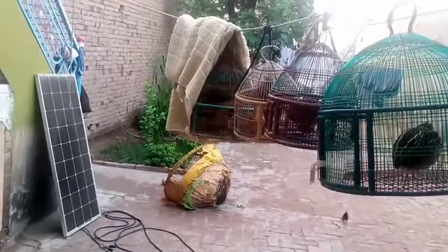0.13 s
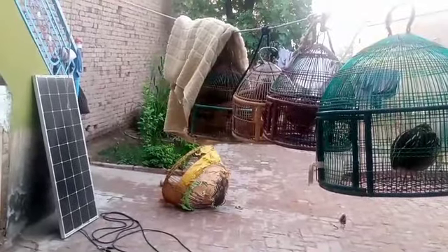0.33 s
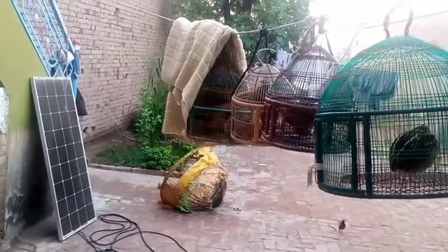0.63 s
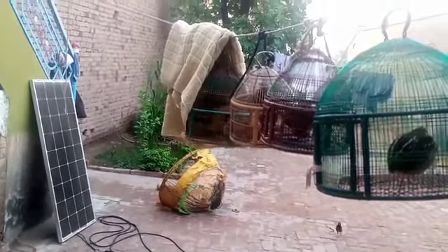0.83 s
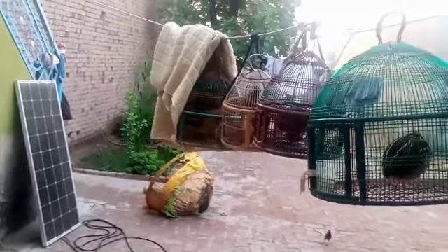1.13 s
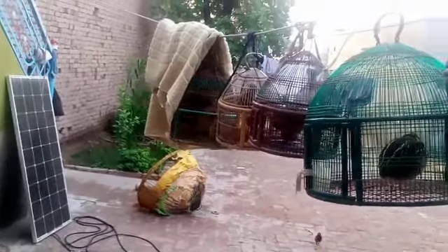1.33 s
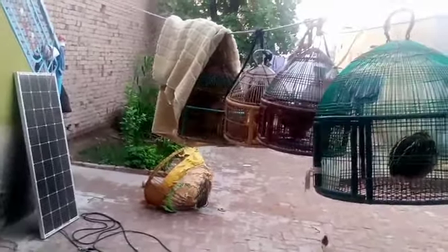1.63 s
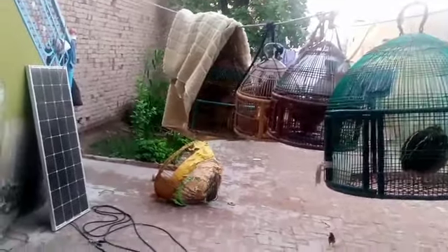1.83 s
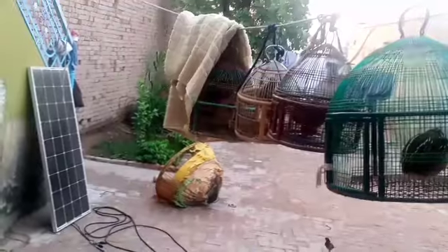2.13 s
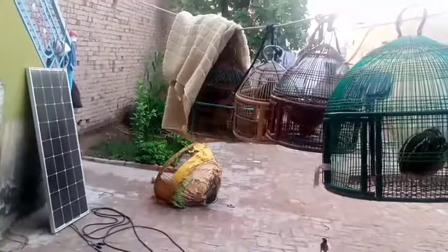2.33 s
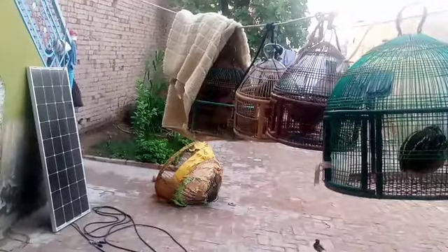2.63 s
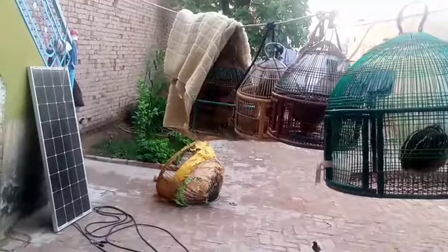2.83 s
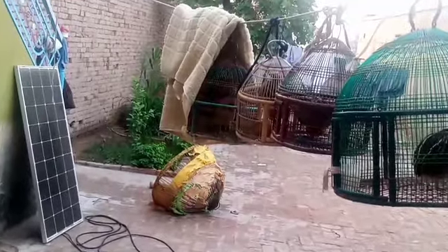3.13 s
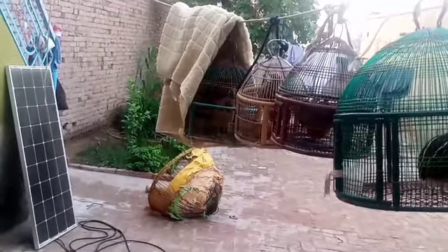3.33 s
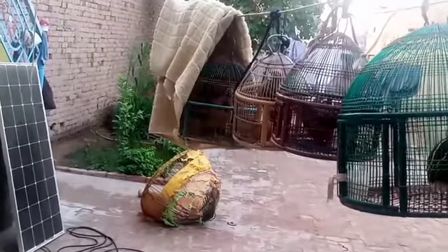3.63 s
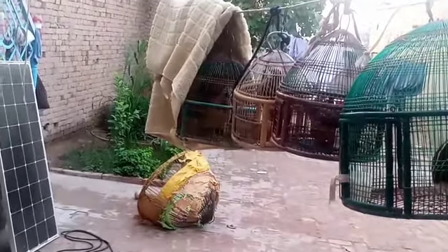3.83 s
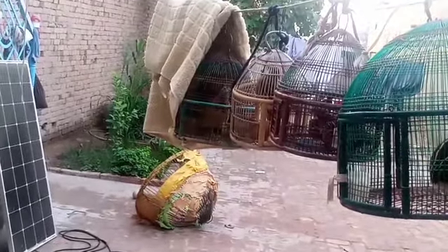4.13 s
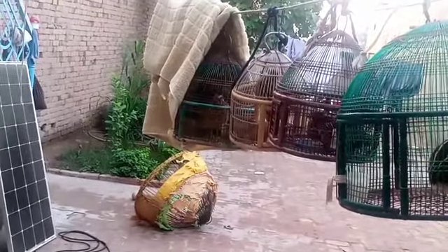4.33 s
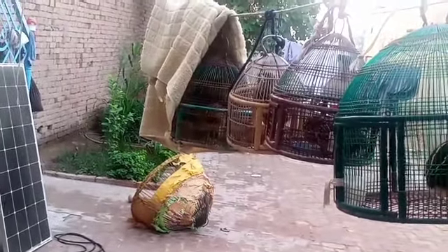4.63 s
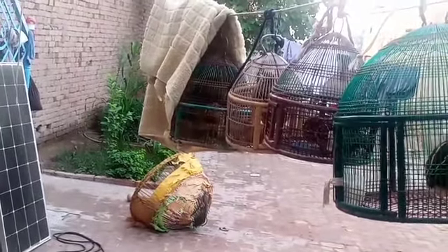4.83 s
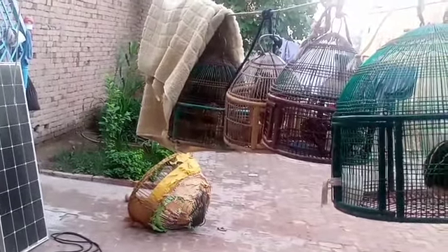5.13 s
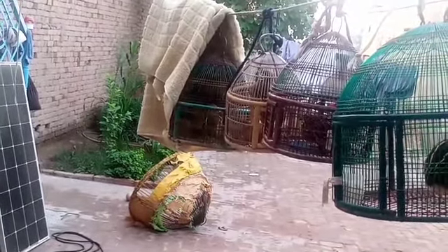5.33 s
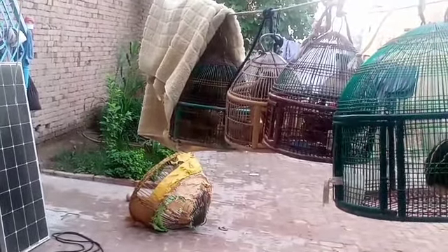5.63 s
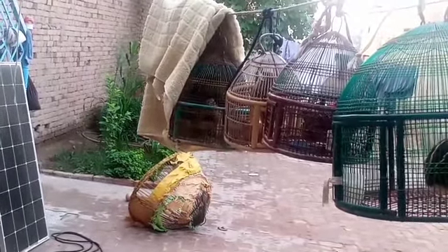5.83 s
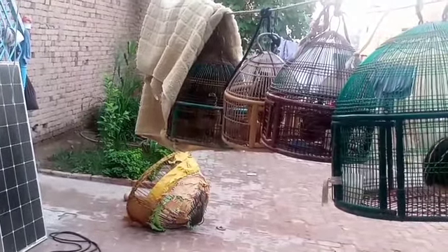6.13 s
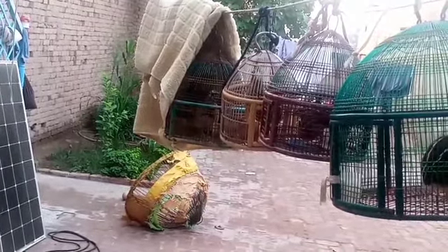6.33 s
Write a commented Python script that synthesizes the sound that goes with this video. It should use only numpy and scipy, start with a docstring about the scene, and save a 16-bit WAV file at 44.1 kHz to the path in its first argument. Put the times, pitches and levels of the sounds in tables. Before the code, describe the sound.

Piercing two-note quail calls flick steeply upward and ring off courtyard walls, over very quiet outdoor air, one dull knock and soft scuffing steps.

```python
"""A caged quail gives five sharp double calls in a brick courtyard: each note is a pure swept sine that sags,
creeps up, then flicks steeply upward. Near walls slap it back, a decaying noise tail makes the yard ring on,
and the loudest moments clip in the handheld phone. A bump on its case and taps on the cage bars ring damped
modes; shaped noise makes the scuffing shoes, footfalls, falling swishes and quiet outdoor murk, and
unsteady sines make two hums and the far-off birds."""
import sys
import numpy as np
from scipy import signal
from scipy.fft import rfft, irfft, next_fast_len
from scipy.io import wavfile
from scipy.ndimage import uniform_filter1d, map_coordinates

SR = 44100
rng = np.random.default_rng(int(sys.argv[2]) if len(sys.argv) > 2 else 0)


def unload_audio(sound):
    """Save the sound as a 16-bit wav file, at the path given as the first command line argument."""
    columns = np.transpose(np.atleast_2d(sound))
    # keep every value between -1 and 1, then stretch to whole-number steps
    steps = np.round(np.clip(columns, -1, 1) * 32767)
    wavfile.write(sys.argv[1], SR, steps.astype(np.int16))


N = 286429  # length in samples
LEAD_S = 0.01  # each note is rendered from this long before its start, to leave room for the swell


def amp(db):
    """Decibels to gain."""
    return 10 ** (np.asarray(db) / 20)


def unit(x):
    """Scale to rms 1."""
    return x / np.sqrt(np.mean(x ** 2) + 1e-20)


def along(points, hz):
    """Read a curve of (f/Hz, value) points on a log frequency axis."""
    f, v = np.transpose(points)
    return np.interp(np.log(hz + 1), np.log(f), v)


def clock():
    """The time of every sample, in seconds."""
    return np.arange(N) / SR


def wobble(rate):
    """A smooth random curve through `rate` random knots a second."""
    knots = rng.standard_normal(int(N * rate / SR) + 4)
    return map_coordinates(knots, [clock() * rate])


def filtered(x, response):
    """Shape the spectrum of x by a gain that is a function of frequency."""
    m = next_fast_len(N + SR // 2)
    gain = response(np.fft.rfftfreq(m, 1 / SR))
    return irfft(rfft(x, m) * gain, m)[:N]


def noise(spectrum, patchy_db):
    """Coloured noise of rms 1, with random gain patches smoothed over time and frequency."""
    z = signal.stft(rng.standard_normal(N), nperseg=1024)[2]
    field = uniform_filter1d(rng.standard_normal(z.shape), size=5, axis=0)
    field = uniform_filter1d(field, size=9, axis=1)
    patchy = signal.istft(z * amp(patchy_db * unit(field)), nperseg=1024)[1][:N]
    return unit(filtered(patchy, lambda hz: amp(along(spectrum, hz))))


def tone(hz, drift_hz):
    """A slightly unsteady sine of rms 1."""
    pitch = hz + drift_hz * wobble(15)
    return unit(np.sin(2 * np.pi * np.cumsum(pitch) / SR))


def add(track, s, sound):
    """Mix a sound into the track at time s."""
    start = max(round(s * SR), 0)
    track[start:start + len(sound)] += sound[:N - start]


def outdoors(air_db=8.6, swing=0.7, murmur_db=-5):
    """Faint far-off murk: broad noise of drifting level, patchier noise weighted low, two wavering hums."""
    # spectrum of the open air: f/Hz, relative level/dB per Hz
    air_spectrum = [(25, -23.5), (80, -7), (230, -10), (340, -6), (430, -10), (520, -8.5), (850, -15),
                    (1200, -16.5), (2250, -10.5), (3200, -16), (4600, -22), (6300, -20), (7400, -29.5),
                    (16000, -32)]
    # distant rumble of the town: f/Hz, relative level/dB per Hz
    town = [(40, -15), (90, 0), (200, -5), (350, 0), (600, -3), (1300, -14), (2500, -40)]
    # drift of the background, ahead of swing and air_db: t/s, level/dB
    air_drift = [(0.0, -73.5), (2.06, -71.5), (3.05, -76.5), (4.95, -73.5), (6.49, -76.5)]
    # faint hums: f/Hz, level/dB, waver/dB, drift/Hz
    hum_rows = [(338, -74.5, 8, 17), (999.1, -70.5, 3, 4)]
    times, drift_db = np.transpose(air_drift)
    level_db = np.interp(clock(), times, drift_db)
    mean_db = level_db.mean()
    level = amp(mean_db + swing * (level_db - mean_db) + air_db)
    murk = level * (noise(air_spectrum, patchy_db=3.0) + amp(murmur_db) * noise(town, patchy_db=5))
    hums = np.zeros(N)
    for hz, db, waver_db, drift_hz in hum_rows:
        hums += amp(db) * unit(amp(waver_db * wobble(13)) * tone(hz, drift_hz))
    return murk + hums


def yard_tail(build, clump_db=2):
    """Diffuse answer of the courtyard, energy 1: it builds up, comes in clumps, decays by frequency."""
    # ring time of the yard: f/Hz, t60/s
    ring_time = [(300, 0.25), (3300, 0.4968), (4200, 0.4847), (5000, 0.45), (6200, .44), (7100, 0.4217)]
    # strength of the yard's answer: f/Hz, level/dB
    colour = [(3350, -6), (3800, 2.93), (5000, -0.5)]
    hz, t, z = signal.stft(rng.standard_normal(SR), SR, nperseg=256)
    decay_db = -60 * t / along(ring_time, hz)[:, None]
    shaped = z * amp(along(colour, hz)[:, None] + decay_db)
    tail = signal.istft(shaped, SR, nperseg=256)[1][:SR]
    clumps = amp(clump_db * unit(uniform_filter1d(rng.standard_normal(SR), size=90)))
    onset = 1 - np.exp(-(np.arange(SR) / SR / build) ** 2)
    tail = tail * clumps * onset
    return tail / np.linalg.norm(tail)


def knee(x, width):
    """Zero below 0 and x above, with a rounded corner."""
    return width * np.logaddexp(0, x / width)


def whistle(length, low_hz, sag_hz, flick_db, creep_bend=0.0018, flick_bend=0.0023,
            top_bend_hz=150, flick_span_hz=700, octave_db=-45):
    """A near-pure tone settles, creeps, then flicks up and fades as it leaves the throat's resonance."""
    # the throat's loudness at each pitch: f/Hz, level/dB
    throat = [(3300, 0), (3550, -2), (4000, -6), (4800, -8.5), (5600, -8.5), (6400, -25.5), (7000, -24)]
    attack_s, swell_s, settle_s, release_s = 0.0058, 0.0027, 0.0074, 0.003
    creep_s, creep_hz_per_s = 0.027, 8030  # the creep leads the flick by creep_s
    flick_s, flick_hz_per_s, flick_top_hz = 0.01847, 251000, 7062.4

    t = np.arange(SR // 8) / SR - LEAD_S
    creep_hz = creep_hz_per_s * knee(t - length + creep_s, creep_bend)
    rise_hz = creep_hz + flick_hz_per_s * knee(t - length, flick_bend)
    pitch = low_hz + sag_hz * np.exp(-t / settle_s) + rise_hz
    pitch = flick_top_hz - knee(flick_top_hz - pitch, top_bend_hz)  # level off at the top
    phase = 2 * np.pi * np.cumsum(pitch) / SR
    swell = (1 + np.tanh((t - attack_s) / swell_s)) / 2
    release = np.clip((length + flick_s - t) / release_s, 0, 1)
    flick_share = np.clip(rise_hz / flick_span_hz, 0, 1)
    level = swell * release * amp(along(throat, pitch) + flick_db * flick_share)
    octave = level ** 2 * amp(octave_db) * np.sin(2 * phase)
    return level * np.sin(phase) + octave


def quail(tail_db=-6.5, build=0.017, lasting=0.33):
    """A long note, then a short one; each overlaps its own wall echoes, so it beats as the pitch climbs."""
    # echoes from walls and cages: delay/s, level/dB
    walls = [(.006951, -4.5), (.008834, -13), (.011006, -10), (.014671, -13), (.016645, -7.4),
             (.018001, -10.5), (.027055, -15), (0.0727, -22)]
    # double calls: start t/s, second note after/s, its time to the flick/s,
    # resting pitch of the long note f/Hz, level/dB, flick of the long note/dB
    calls = [(0.0228, 0.24, 0.04104, 3244, -2.5, -3), (1.3938, 0.23765, 0.04275, 3266, -4, -1),
             (2.7424, 0.23583, .0438, 3286, -2.5, 0.43), (4.0825, .2389, .0451, 3289, -2, -0.42),
             (5.3847, 0.24088, .046, 3278, -3.5, -0.19)]
    long_s, long_sag_hz = 0.0658, 343.5
    # the short note against the long one: its own sag, lower pitch, level and extra flick
    short_sag_hz, short_drop_hz, short_db, short_flick_db = 145.3, 25, -0.55, 1.503

    out, samples = np.zeros(N), np.arange(SR)
    # the direct sound, then each slap
    early = (samples == 0) + sum(amp(db) * np.sinc(samples - delay * SR) for delay, db in walls)
    fixed_tail, share = yard_tail(build), np.clip(lasting, 0, 1)
    for start, gap, short_s, low_hz, db, flick_db in calls:
        long_note = whistle(long_s, low_hz, long_sag_hz, flick_db)
        short_note = amp(short_db) * whistle(
            short_s, low_hz - short_drop_hz, short_sag_hz, flick_db + short_flick_db)
        for s, note in ((start, long_note), (start + gap, short_note)):
            # the phone moves a little between notes, so part of the yard's answer changes
            tail = np.sqrt(share) * fixed_tail + np.sqrt(1 - share) * yard_tail(build)
            heard = signal.fftconvolve(note, early + amp(tail_db) * tail)
            add(out, s - LEAD_S, amp(db) * heard)
    return out


def far_birds(note_width=0.055):
    """Short phrases of evenly spaced hoots or peeps, each an unsteady sine around one pitch."""
    # phrases: first note t/s, notes, spacing/s, f/Hz, level/dB
    phrases = [(1.05, 2, 0.293, 515, -65), (2.12, 3, .17, 700.3, -64.5), (5.36, 2, .25, 2060, -68)]
    out = np.zeros(N)
    for first, count, spacing, hz, db in phrases:
        notes = np.zeros(N)
        for k in range(round(count)):
            notes += np.exp(-((clock() - first - k * spacing) / note_width) ** 2)
        out += amp(db) * notes * tone(hz, drift_hz=13)
    return out


def swishes(fade=0.05, glide=0.15):
    """Bands of soft noise that fade in, slide down towards a resting pitch and fade out."""
    # soft swishes: start t/s, length/s, from f/Hz, towards f/Hz, width/Hz, level/dB
    sweeps = [(1.12, 0.23, 6030, 5520, 440, -62.5), (2.41, .38, 2800, 1600, 200, -56),
              (2.4, 0.44, 3200, 2100, 380, -63)]
    out = np.zeros(N)
    for start, length, from_hz, to_hz, width_hz, db in sweeps:
        t = np.maximum(clock() - start, 0)
        centre_hz = to_hz + (from_hz - to_hz) * np.exp(-t / glide)
        band = filtered(rng.standard_normal(N), lambda hz: np.exp(-(hz / width_hz) ** 2 / 2))
        carrier = np.cos(2 * np.pi * np.cumsum(centre_hz) / SR)
        level = amp(db) * np.clip(np.minimum(t, length - t) / fade, 0, 1)
        out += level * unit(band * carrier)
    return out


def shoes(grain_db=-1.0, unevenness_db=0.09):
    """Each slide of a sole on the paving swells and fades, roughened by grit."""
    # scuffs: peak t/s, rise/s, fall/s, level/dB
    scuffs = [(1.92, 0.1, 0.166, -54.5), (2.099, 0.0344, 0.0308, -48.5), (4.62, 0.051, 0.178, -45),
              (4.868, 0.108, 0.089, -38.5), (5.13, 0.161, 0.033, -51.5)]
    # colour of the grit: f/Hz, relative level/dB per Hz
    grit = [(410, -81), (700, -48.5), (975, -24), (1190, -30.5), (1420, -9), (1750, -10.5), (2200, -2.5),
            (3510, -1.5), (3950, -3), (5810, -7.5), (9000, -40), (11700, -78), (19800, -120)]
    t = clock()
    power = np.zeros(N)
    for s, rise, fall, db in scuffs:
        spread = np.where(t < s, rise, fall)
        power += amp(db) ** 2 * np.exp(-2 * ((t - s) / spread) ** 2)
    roughness = amp(grain_db * wobble(370) + unevenness_db * wobble(22))
    return np.sqrt(power) * unit(roughness * noise(grit, patchy_db=4.0))


def strikes(blows, modes, contact):
    """Every blow rings the same damped modes; a longer contact (s) softens the click."""
    out, t = np.zeros(N), np.arange(SR // 8) / SR
    ring = sum(amp(db - 60 * t / t60) * np.sin(2 * np.pi * hz * t) for hz, db, t60 in modes)
    for s, db in blows:
        add(out, s, amp(db) * ring * (1 - np.exp(-t / contact)))
    return out


def knocks(bump_wet_db=-26, tap_wet_db=0, low_cut_hz=95):
    """Bumps reach the microphone through the case, nearly dry; the cage taps ring round the yard."""
    # blows on the phone's body: t/s, level/dB
    bump_blows = [(1.9995, -22.5), (2.0044, -12)]
    # modes of the case: f/Hz, level/dB, t60/s
    case = [(99, -20, 0.069), (249, 4.5, 0.011), (423, -1.5, 0.0069), (1201, -2.5, 0.00327),
            (2930, -7, 0.0052)]
    # light taps on cage bars: t/s, level/dB
    tap_blows = [(2.106, -42.5), (6.2525, -34.5)]
    # modes of a bar: f/Hz, level/dB, t60/s
    bar = [(2670, -8, 0.0083), (2993.6, 8.5, 0.0049), (4087, -16, 0.0313)]
    low_cut = signal.butter(2, low_cut_hz, "high", fs=SR, output="sos")
    bumps = signal.sosfilt(low_cut, strikes(bump_blows, case, contact=0.000225))
    taps = strikes(tap_blows, bar, contact=0.00035)
    airborne = amp(bump_wet_db) * bumps + amp(tap_wet_db) * taps
    return bumps + taps + signal.fftconvolve(airborne, yard_tail(build=0.007))[:N]


def footfalls(length=0.038):
    """A sole lands with a short dull puff of noise."""
    # landings: t/s, level/dB
    landings = [(2.11, -54.5), (5.072, -62.5)]
    # colour of the sole: f/Hz, relative level/dB per Hz
    sole = [(200, -26), (450, -6), (1300, -1.5), (2500, -24)]
    puffs = sum(amp(db) * np.exp(-((clock() - s) / length) ** 2) for s, db in landings)
    return puffs * noise(sole, patchy_db=1.5)


def scene():
    """The microphone dulls the sources steeply above 7 kHz; the outdoor bed joins after that filter."""
    # microphone response: f/Hz, gain/dB
    mic = [(6900, -1), (7100, 2), (7300, -14.5), (7700, -31), (9000, -46)]
    sources = quail() + far_birds() + swishes() + shoes() + knocks() + footfalls()
    return (filtered(sources, lambda hz: amp(along(mic, hz))) + outdoors())[None]


def record(dry, ceiling=0.6744, hardness=22, lopsided=0.0039, rasp_db=-37, top_hz=15850):
    """Loud peaks clip a little unevenly, adding a thin third harmonic and faint rasp; then a band limit."""
    top = ceiling * (1 + lopsided * np.sign(dry[0]))
    clipped = dry[0] / (1 + np.abs(dry[0] / top) ** hardness) ** (1 / hardness)
    # noise that sounds only where the clipping bites
    rasp = amp(rasp_db) * (dry[0] - clipped) * rng.standard_normal(N)
    return filtered(clipped + rasp, lambda hz: hz < top_hz)[None]


dry = scene()
out = record(dry)
unload_audio(out)
```